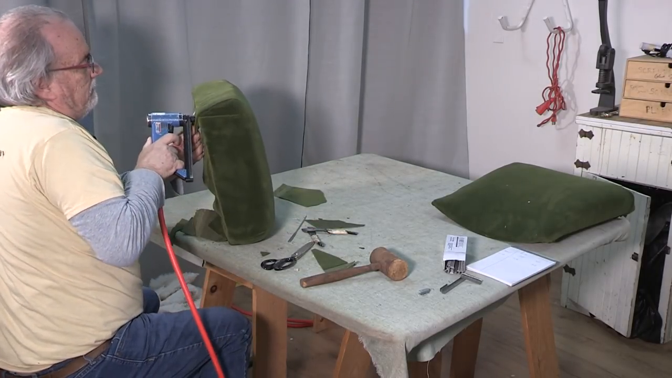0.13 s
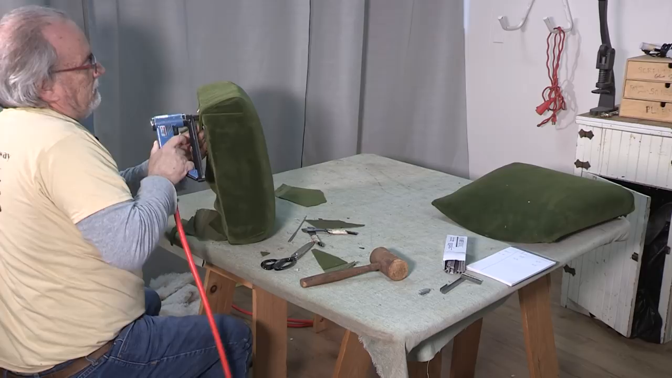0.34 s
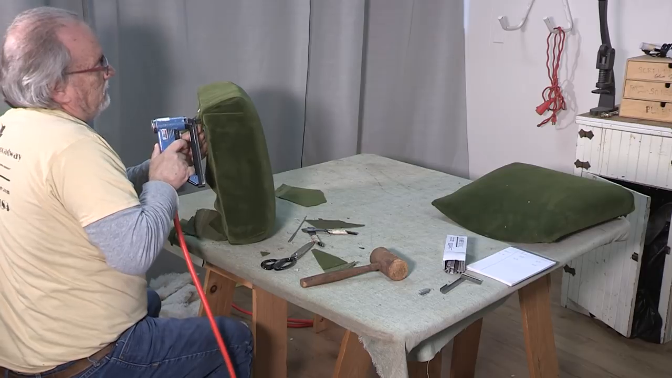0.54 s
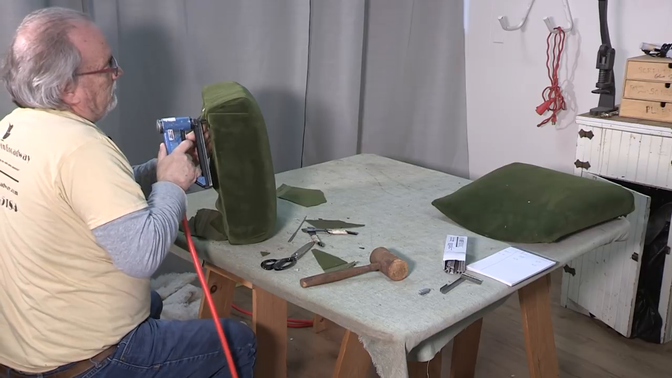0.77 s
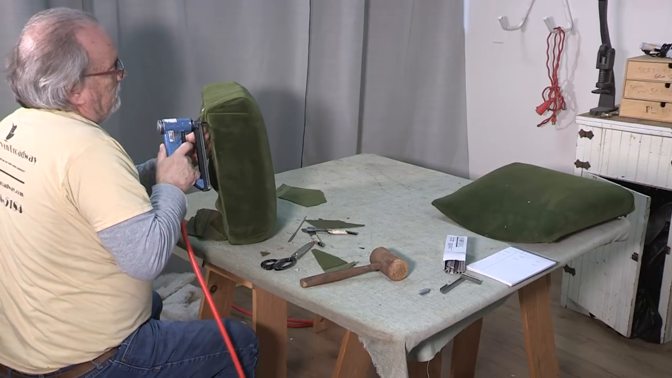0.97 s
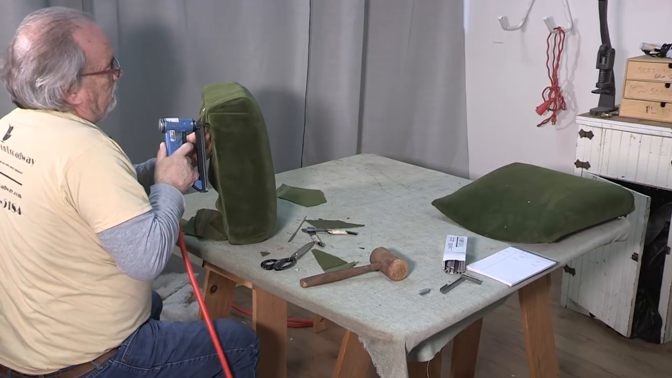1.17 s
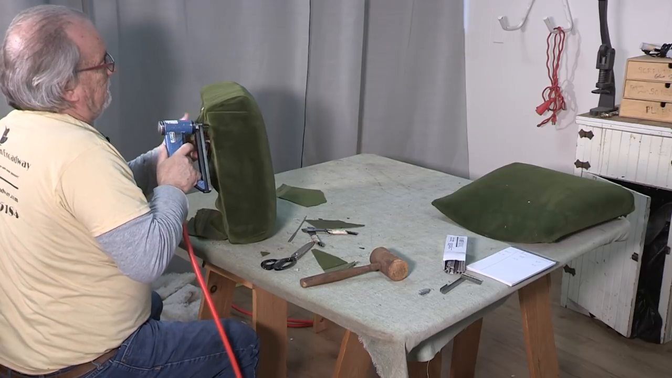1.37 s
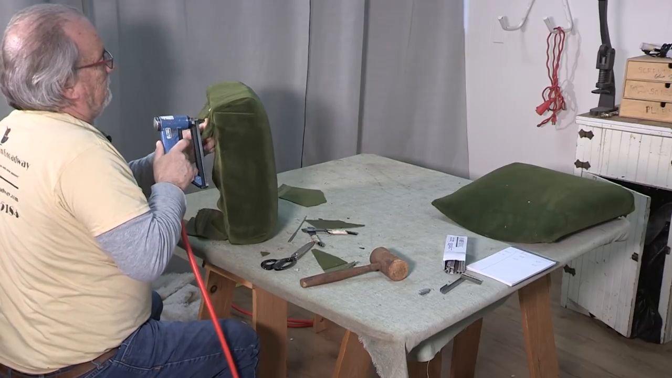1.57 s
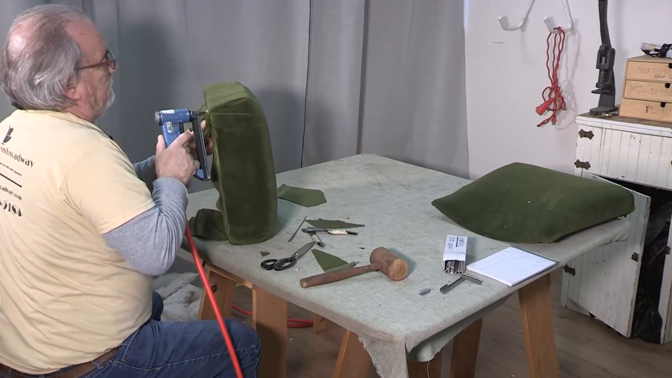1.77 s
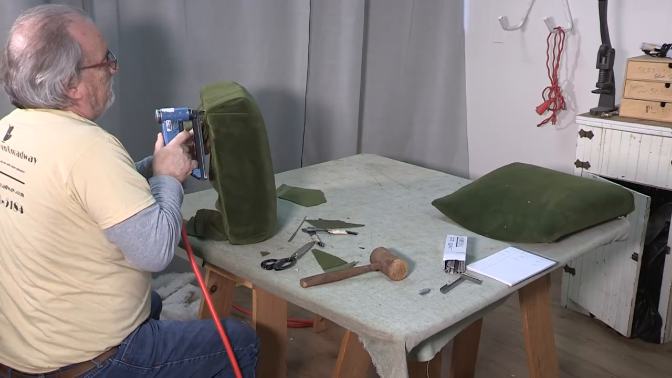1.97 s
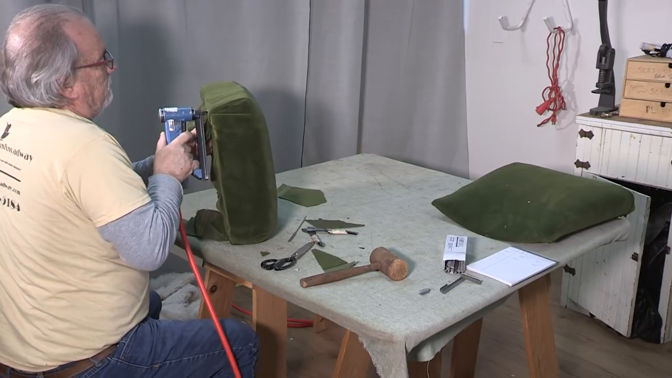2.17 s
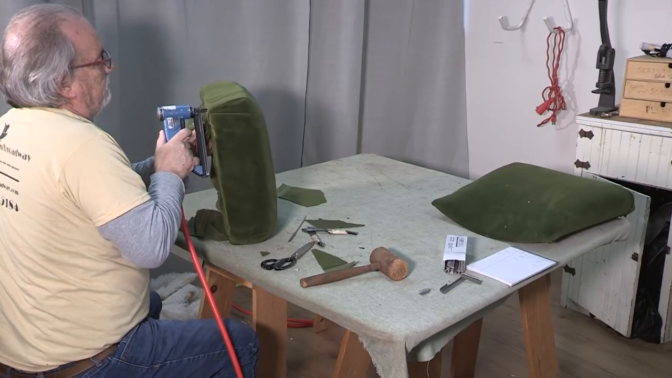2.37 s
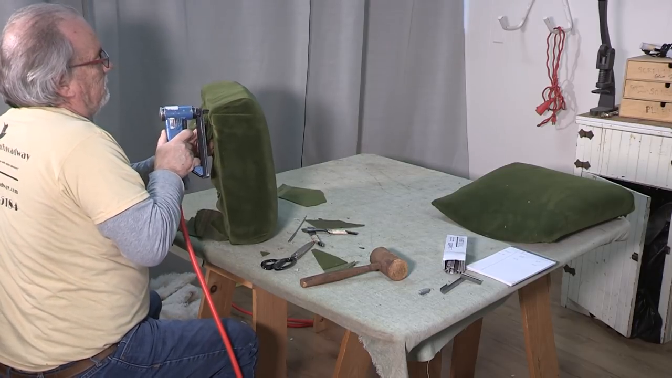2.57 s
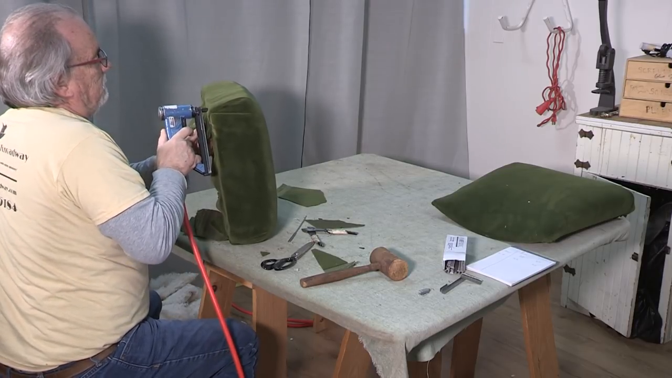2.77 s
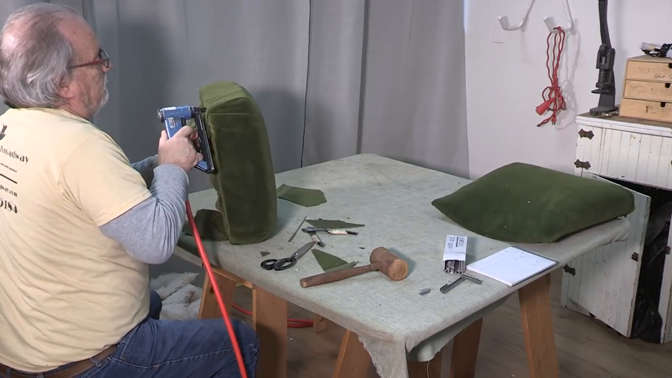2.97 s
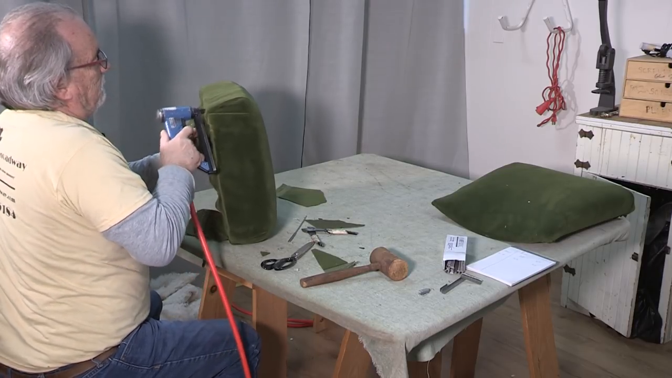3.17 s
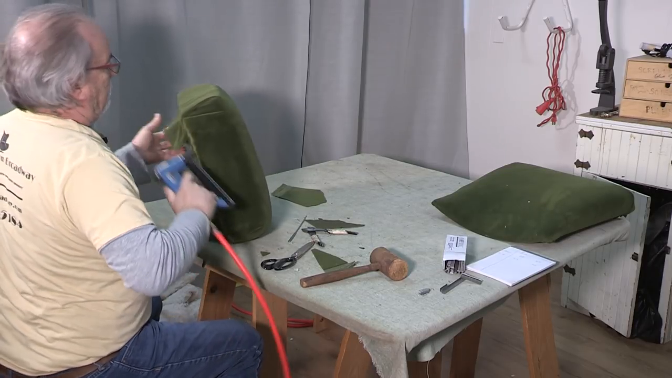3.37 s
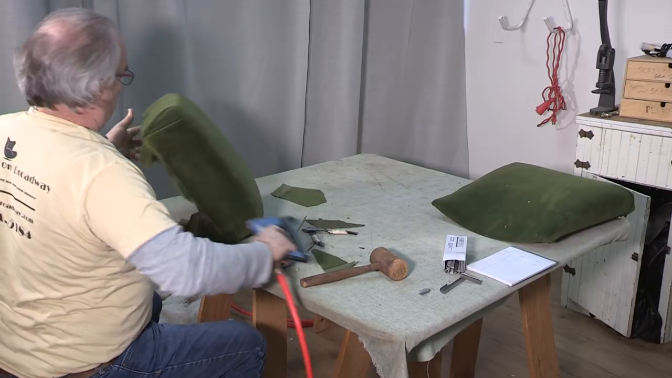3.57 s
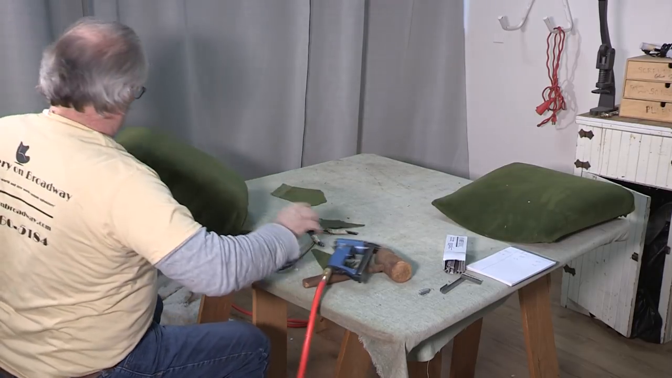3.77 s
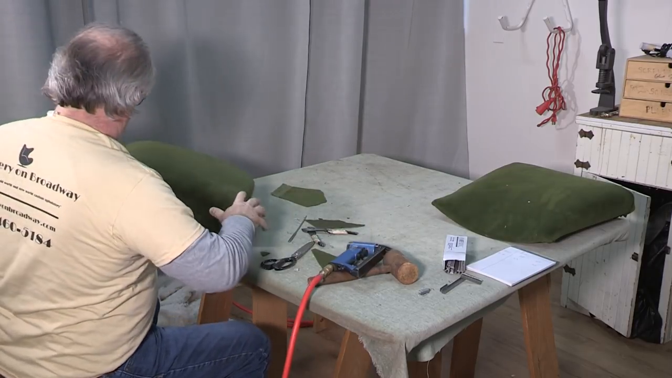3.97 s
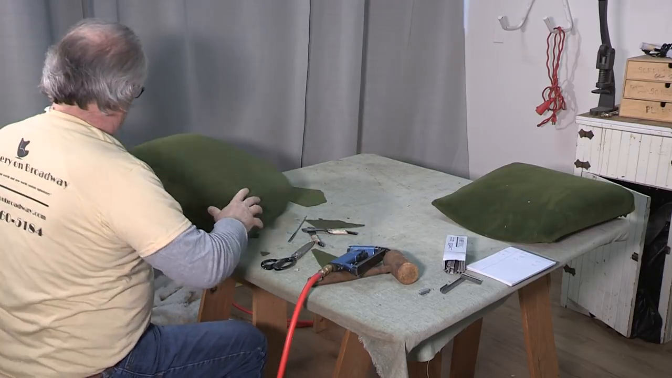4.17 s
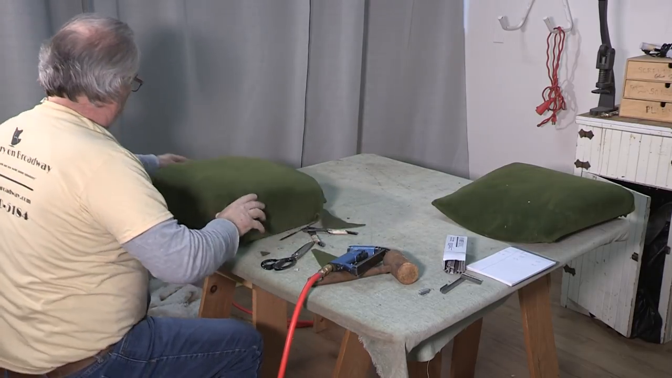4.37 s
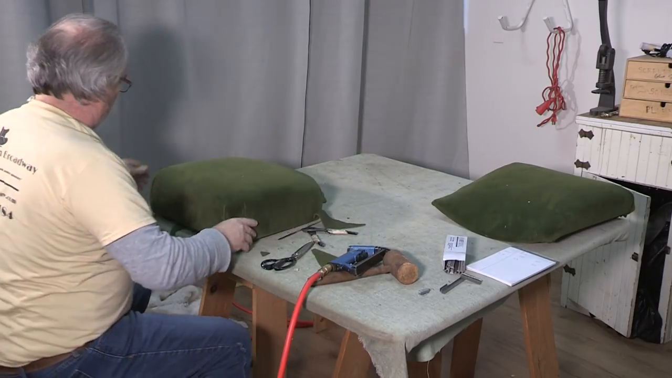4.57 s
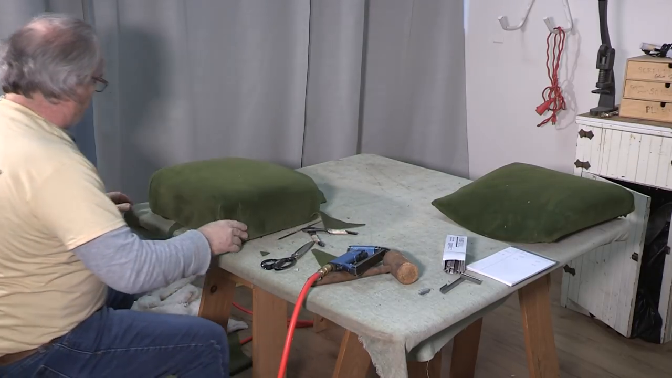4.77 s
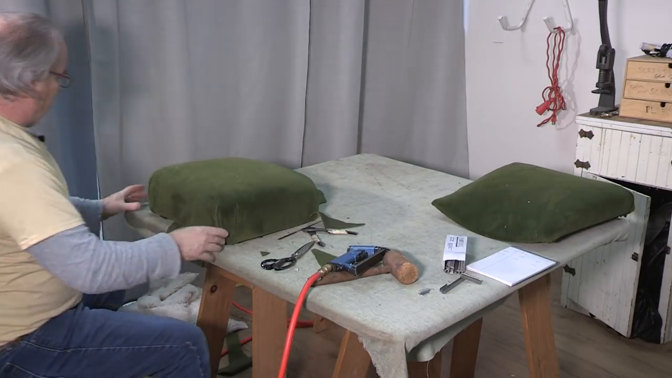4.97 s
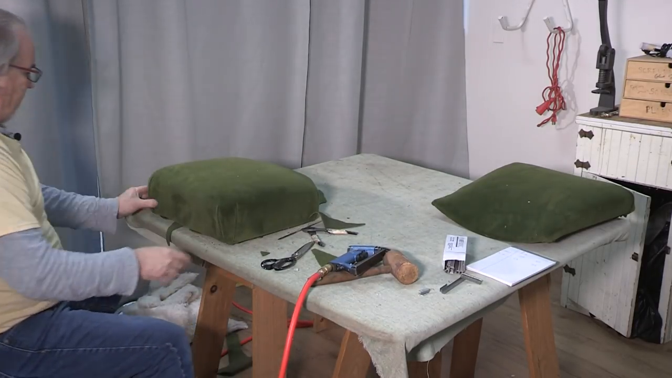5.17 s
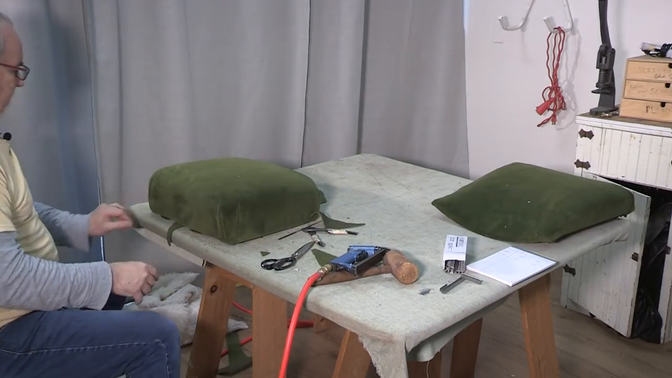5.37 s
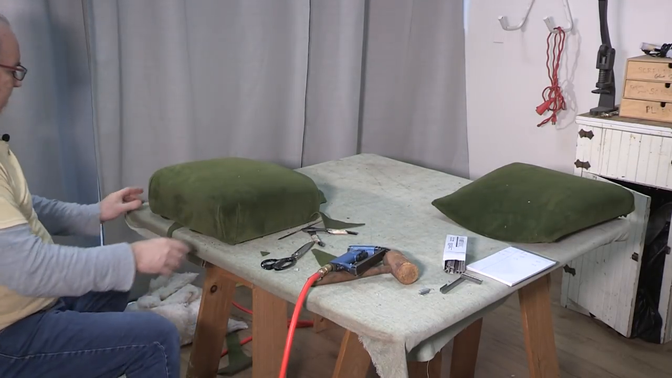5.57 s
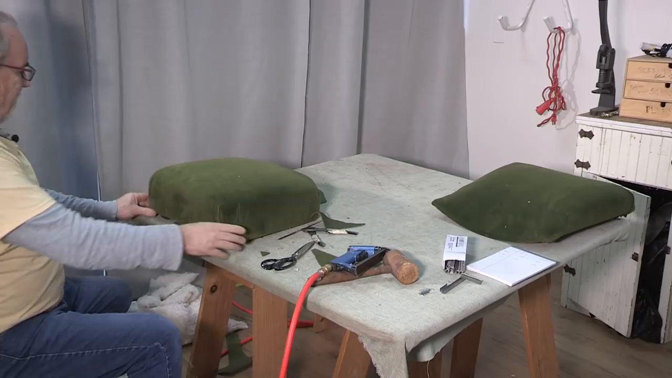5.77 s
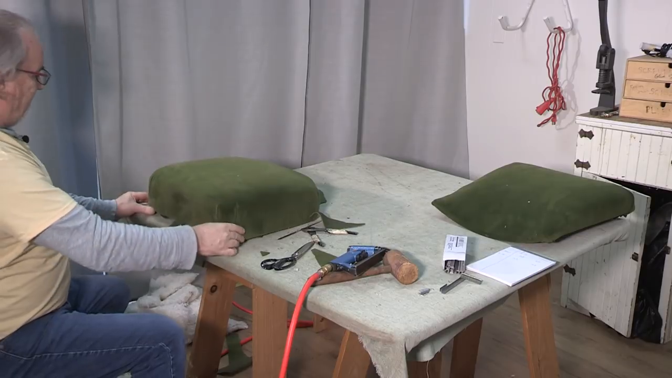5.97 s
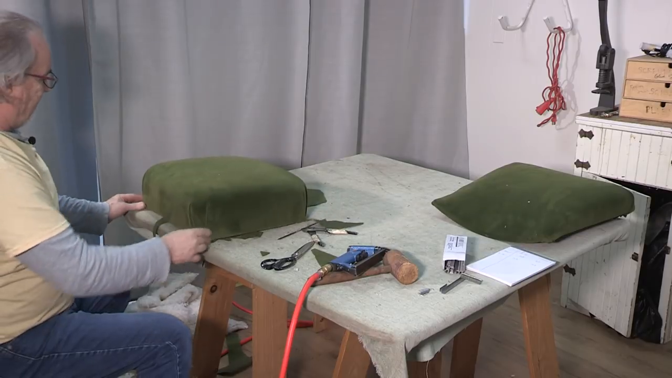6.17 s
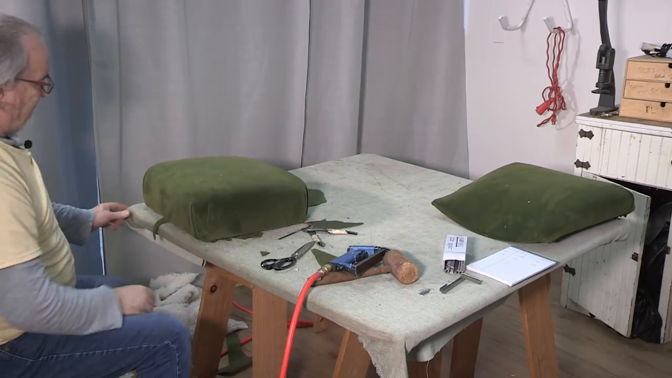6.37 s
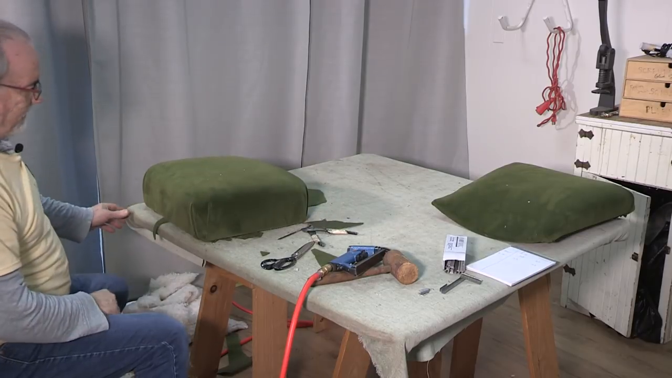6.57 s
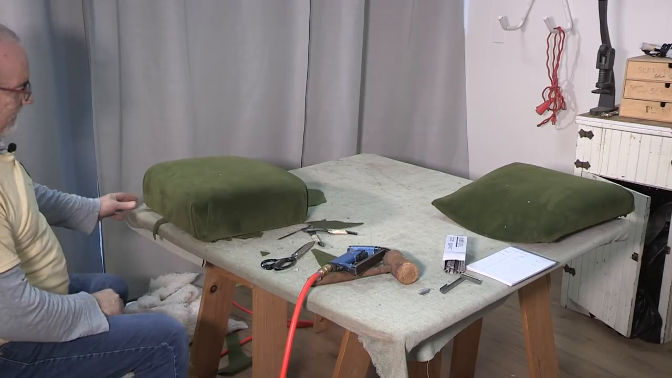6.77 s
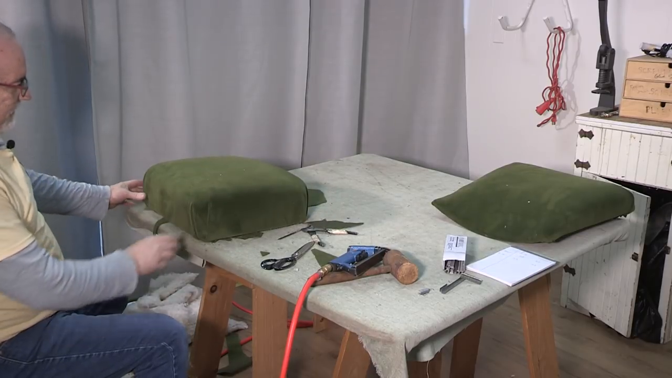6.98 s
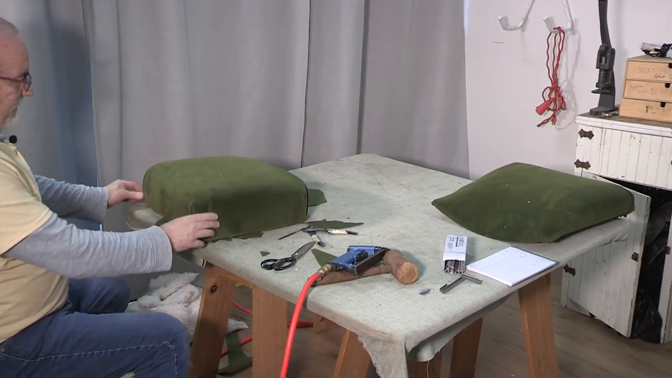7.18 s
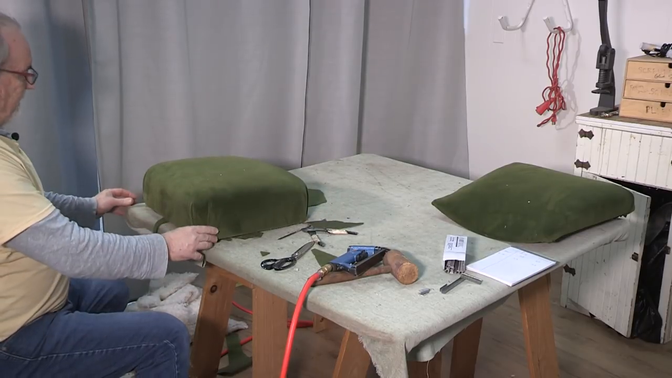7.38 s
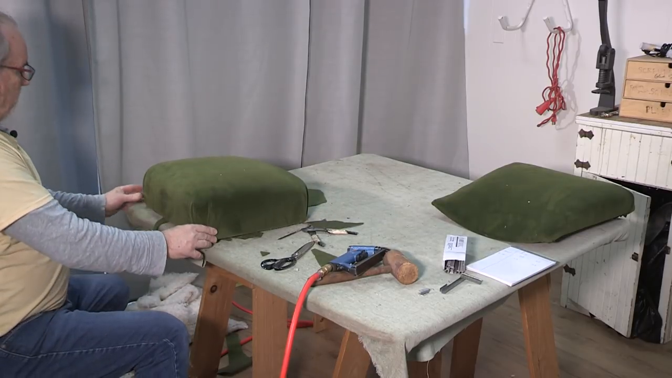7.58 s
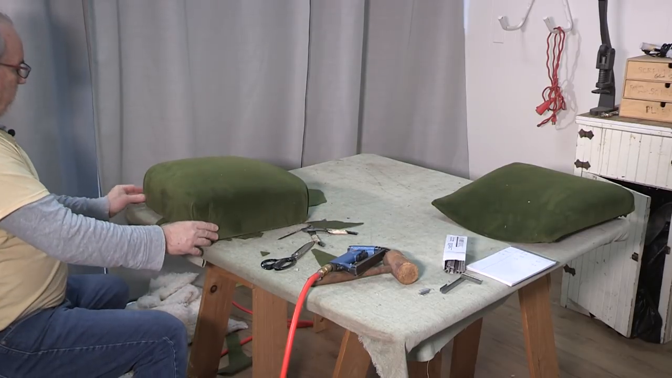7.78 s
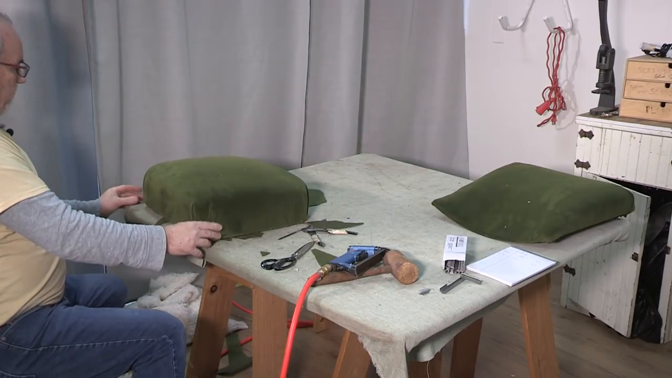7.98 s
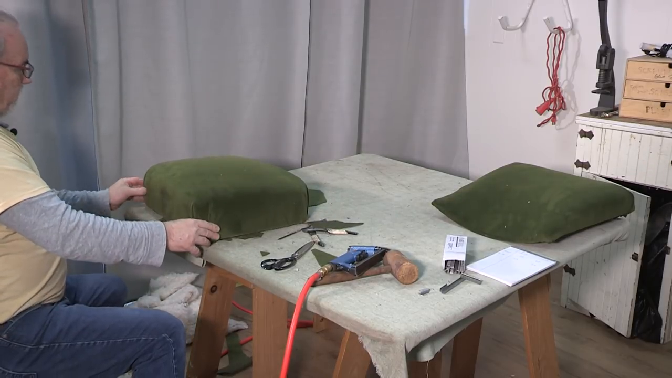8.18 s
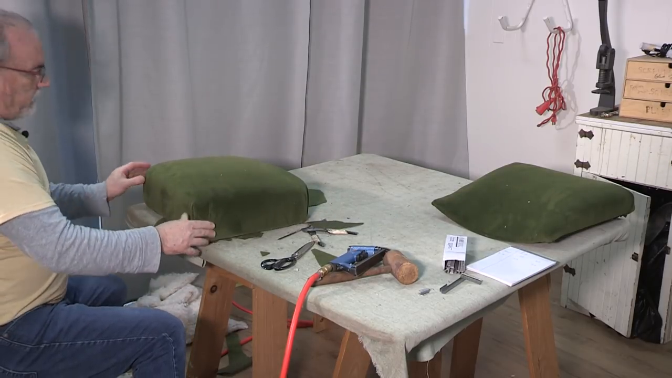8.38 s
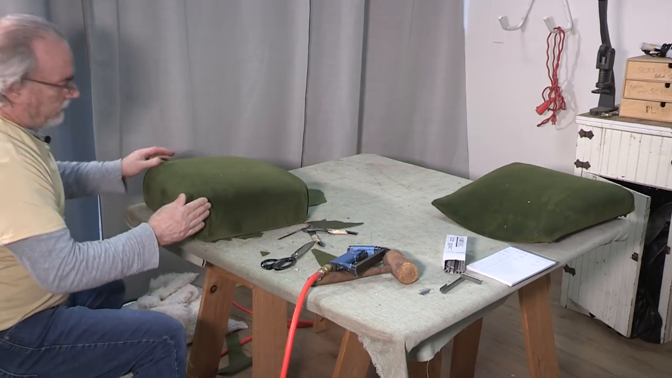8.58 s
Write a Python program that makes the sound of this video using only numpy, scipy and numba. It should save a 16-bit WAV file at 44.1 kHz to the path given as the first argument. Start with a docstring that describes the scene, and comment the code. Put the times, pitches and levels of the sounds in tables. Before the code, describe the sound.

Six snapping, puffing shots from a pneumatic staple gun in a small workshop, then the tool is dropped and a cushioned seat shifted around.

```python
"""An air stapler fires six times into a padded seat, close to the microphone in a small workshop.
Each shot is a trigger tick, a blast of air with the blade's blow, then the piston's thump and exhaust.
The tool is dropped on the table, the seat laid flat and the table dragged about, with knocks and clicks.
Echoes flutter between the walls over a hissing hose, heard by a stereo camera with gain control."""
import sys
import numpy as np
from scipy import signal
from scipy.fft import rfft, irfft
from scipy.io import wavfile
from scipy.ndimage import uniform_filter1d
from numba import njit

SR = 44100
rng = np.random.default_rng(int(sys.argv[2]) if len(sys.argv) > 2 else 0)


def generate_wav(sig):
    """Save sig (samples, or channels by samples) to the path in sys.argv[1] as 16-bit PCM at SR."""
    pcm = np.round(np.clip(np.atleast_2d(sig).T, -1, 1) * 32767).astype(np.int16)
    wavfile.write(sys.argv[1], SR, pcm)


N = 380583


def undb(db):
    return 10 ** (np.asarray(db) / 20)


def on_log(table, hz):
    """Reads a table along a log frequency axis."""
    points_hz, values = np.transpose(table)
    return np.interp(np.log(np.maximum(hz, 1)), np.log(points_hz), values)


def level_curves(table):
    """One dB curve per level column, silent outside the table's times."""
    times, *columns = np.transpose(table)
    return [np.interp(np.arange(N) / SR, times, db, left=-120, right=-120) for db in columns]


def colour(x, tone, peaks=(), tilt_db=0):
    """Causal filter: a tone curve, resonances and a tilt per octave; white noise keeps its rms."""
    hz = np.fft.rfftfreq(8192, 1 / SR)
    db = on_log(tone, hz) + tilt_db * np.log2(np.maximum(hz, 50) / 2000)
    db += sum(boost / (1 + (2 * (hz - centre) / width) ** 2) for centre, width, boost in peaks)
    cepstrum = irfft(db * np.log(10) / 20)
    cepstrum[1:4096] *= 2  # fold to minimum phase
    cepstrum[4097:] = 0
    impulse = irfft(np.exp(rfft(cepstrum)))[:4096]
    return signal.oaconvolve(x, impulse / np.sqrt(np.sum(impulse ** 2)))[:len(x)]


def hump(hz, octaves, skirt_db):
    """Tone curve of a resonance, 10 dB down at `octaves` to each side."""
    return [(hz * 2 ** (-2.5 * octaves), min(skirt_db + 7, -24)),
            (hz * 2 ** -octaves, -10), (hz, 0), (hz * 2 ** octaves, -10),
            (min(hz * 2 ** (2.7 * octaves), 15000), skirt_db), (20000, skirt_db - 19)]


def burst(rise_s, fall_s, blow=0.):
    """Grainy noise that rises, then dies away; a hard blow leads it with one sharp push."""
    t = np.arange(SR // 2) / SR
    noise, grain = rng.standard_normal((2, len(t)))
    envelope = (1 - np.exp(-t / max(rise_s, 1e-4))) ** 2 * np.exp(-t / max(fall_s, 1e-3))
    x = noise * undb(3.5 * grain) * envelope
    x[0] = blow * np.sqrt(np.sum(x ** 2))
    return x[:int((10 * fall_s + .1) * SR)]


def add(out, start_s, x, db, pan_db=0):
    """Places a sound; db is its energy spread over 2 ms, pan_db is left minus right."""
    i = int(start_s * SR)
    x = x[:N - i] * undb(db) * np.sqrt(.002 * SR / np.sum(x ** 2))
    out[:, i:i + len(x)] += x * undb(np.array([[pan_db], [-pan_db]]) / 2)


def walk(rate_hz):
    """Glides between random levels; spread near 1."""
    step = int(SR / rate_hz)
    return uniform_filter1d(np.repeat(rng.standard_normal(N // step + 1), step), step)[:N]


def rough_noise(depth_db, rate_hz):
    """Noise whose level flickers."""
    return rng.standard_normal(N) * undb(depth_db * walk(rate_hz))


def pair(x, y, likeness):
    """Left and right channels from two unrelated sounds."""
    mid, side = np.sqrt(1 + likeness) * x, np.sqrt(1 - likeness) * y
    return np.array([mid + side, mid - side]) / np.sqrt(2)


# room tone of the workshop: pitch_hz, level_db
SHOP_TONE = [(25, -50), (60, -20.5), (130, -3.5), (180, -14.5), (260, -7.5), (500, -12.5), (1000, -20.5),
             (2000, -22.5), (3000, -26.5), (4500, -33), (5600, -34), (6700, -24), (8200, -30.5),
             (9500, -29), (12000, -43), (15800, -41)]


def shop_air():
    """Low, faintly wavering noise all around the microphone."""
    air = [colour(rng.standard_normal(N), SHOP_TONE) for _ in range(2)]
    return pair(*air, likeness=0.77) * undb(-51.5 + 0.46 * walk(3.1))


# escaping air: pitch_hz, level_db
LEAK_TONE = [(4000, -8), (7000, -6.5), (9500, -6.5), (12500, -1.5), (15500, -7.5)]
# its whistles: pitch_hz, width_hz, boost_db
LEAK_WHISTLES = [(11950, 500, 4), (14100, 270, -1), (9440, 1100, 10)]
# tugs on the hose: peak_s, level_db, half_length_s
HOSE_TUGS = [(0.0, -44, 0.033), (0.81, -43, 0.083), (1.936, -61.5, 0.29), (3.754, -49, 0.27)]


def hose_leak():
    """The coupling hisses, louder when tugged; the hiss dips after each shot and swells back."""
    leak_db, dip_db, recover_s = -57.5, -28, 0.25
    t = np.arange(N) / SR
    dips_db = sum(dip_db * (t > s) * np.exp(-np.abs(t - s) / recover_s) for s, *_ in BLASTS)
    tugs = sum(undb(db) * np.exp(-((t - s) / half_s) ** 2) for s, db, half_s in HOSE_TUGS)
    hiss = [colour(rng.standard_normal(N), LEAK_TONE, LEAK_WHISTLES) for _ in range(2)]
    return pair(*hiss, likeness=0.48) * (undb(leak_db + dips_db) + tugs)


# bumps on seat and table: start_s, level_db, pitch_hz, width_octaves, fall_s, pan_db
KNOCKS = [(0.0, -13.5, 380, 1.53, 0.0066, -3), (0.031, -11.5, 200, 1.43, 0.3, 0.5),
          (0.179, -0.5, 284, 1.45, 0.0023, 2), (0.184, -13, 142, 0.72, 0.032, -0.5),
          (3.661, -12.5, 680, 0.98, 0.025, 1.5), (3.89, -12, 840, 0.29, 0.0054, -3),
          (4.105, -32.5, 285, 0.81, .005, 4), (4.137, -36, 298, 0.96, 0.009, -1.5),
          (4.524, -16, 158, 1.3, 0.017, 2.5), (4.56, -18, 332, 1.76, 0.0055, 2),
          (4.664, -23.5, 313, 0.52, 0.0034, 2), (4.7392, -27.5, 494, 1.44, 0.0026, 4),
          (4.874, -25.5, 467, 0.22, .006, 3), (4.948, -27.5, 736, 0.42, 0.0038, -4),
          (4.963, -21, 317, 0.96, 0.0034, 0), (5.04, -27.5, 450, 0.67, 0.017, 0),
          (5.2, -32, 410, 0.97, 0.019, 5), (5.3, -34, 328, 0.39, .006, 5),
          (5.40, -27.5, 281, 0.89, .011, 0), (5.635, -31.5, 260, 0.93, 0.011, -1),
          (5.70, -24, 239, .7, 0.0076, 1.5), (5.754, -31, 237, .9, 0.0031, 1),
          (5.861, -35.5, 239, 1.13, .006, 0), (6.183, -24.5, 660, 0.76, .005, -2),
          (8.156, -41.5, 270, 0.36, 0.0064, 2), (8.246, -21, 700, 0.63, 0.047, -1),
          (8.383, -39, 815, 0.32, 0.0053, -2), (8.504, -19, 746, 0.94, 0.008, -1),
          (8.508, -30.5, 260, 1.1, .012, 1)]


def knocks(out):
    """Blows on wood and padding, each with one dull resonance."""
    for s, db, hz, octaves, fall_s, pan_db in KNOCKS:
        add(out, s, colour(burst(0.00064, fall_s, blow=0.76), hump(hz, octaves, -43)), db, pan_db)


# clicks and creaks: start_s, level_db, pitch_hz, width_octaves, fall_s, crack_db, pan_db
CLICKS = [(0.18, -13, 1440, 0.87, 0.0016, -46, -6), (3.831, -10.5, 3220, 0.11, 0.0051, -32, -5),
          (4.528, -29, 2630, .84, .005, -36, 3), (4.534, -19.5, 1780, 0.64, 0.033, -40, 1),
          (4.873, -30, 1820, .3, .009, -41, 1), (4.94, -33, 2020, .35, 0.012, -25, 2),
          (5.714, -38, 4020, .25, 0.0069, -22, 3), (6.2, -36.5, 1670, 0.71, 0.0081, -27, -4),
          (6.349, -28, 2080, 0.21, .002, -29, 1), (6.654, -47, 2200, .26, 0.0043, -48, -3),
          (6.832, -24.5, 4300, 0.65, 0.0036, -42, 0), (6.84, -29.5, 2200, 0.33, 0.0023, -36, -4),
          (6.845, -21, 4200, 0.42, 0.01, -38, -3), (7.067, -39, 3630, 0.34, 0.0033, -40, -7),
          (7.691, -37.5, 4650, .15, .019, -47, -13), (7.701, -38, 2150, .16, 0.015, -7, -14),
          (7.736, -23.5, 3840, 0.44, 0.019, -22, -3.5), (8.065, -41.5, 3530, .1, .008, -31, -6),
          (8.238, -20, 3300, 0.57, 0.0078, -20, -10), (8.248, -13, 3070, 0.62, 0.019, -16, -1.5),
          (8.25, -18.5, 3570, .19, 0.05, -52, -1), (8.513, -26.5, 1700, 0.61, .045, -42, -3.5)]


def clicks(out):
    """A bright resonance over a broad crack; longer rattles swell more slowly."""
    for s, db, hz, octaves, fall_s, crack_db, pan_db in CLICKS:
        rattle = burst(0.16 * fall_s, fall_s, blow=0.39)
        add(out, s, colour(rattle, hump(hz, octaves, crack_db)), db, pan_db)


# resonances of the stapler's body: pitch_hz, width_hz, boost_db
TOOL_BODY = [(315.6, 105, 7), (1700, 270, 3.5), (2015, 160, 4.5), (2516, 320, 1), (6550, 380, 1.5),
             (8920, 730, 3)]
# trigger pulls: start_s, level_db, rise_s, fall_s
TICKS = [(0.186, -23, 0.00085, 0.0025), (0.711, -22.5, 0.015, 0.013), (1.139, -27, 0.017, 0.012),
         (2.176, -20, 0.017, 0.012), (2.609, -34, .01, 0.012), (2.631, -20.5, 0.0022, 0.0073),
         (3.108, -27, 0.0012, .008)]


def trigger(out):
    """The trigger ticks and the valve gives its first hiss."""
    for s, db, rise_s, fall_s in TICKS:
        add(out, s, colour(burst(rise_s, fall_s), hump(3900, 2.1, -18), TOOL_BODY), db)


# the six shots: start_s, level_db, tilt_db_per_octave, pan_db
BLASTS = [(0.203, -3.5, -1, -1), (0.727, 0.5, 2.5, -0.3), (1.156, -2.5, 1.6, -0.3), (2.192, -4, 0.9, -2.5),
          (2.645, -0.5, 2.2, -2), (3.128, -3.5, 0.8, 1.5)]
# the driving air: pitch_hz, level_db
BLAST_TONE = [(35, -61), (60, -25), (206, -13.5), (291, -7), (433, -16), (642, -2.5), (738, -11),
              (1630, -5), (1870, -11.5), (2650, -8), (5580, -20.5), (6710, -17), (15500, -27.5)]


def air_blasts(out):
    """Compressed air bursts through the tool's body, close to the microphone."""
    for s, db, tilt_db, pan_db in BLASTS:
        air = burst(rise_s=0.0058, fall_s=0.012)
        add(out, s, colour(air, BLAST_TONE, TOOL_BODY, tilt_db), db, pan_db)


# the blade's cracks and their echoes: start_s, level_db
CRACKS = [(0.2137, -5), (0.226, -10.5), (0.736, -5.5), (1.1605, -6), (1.1764, -12), (2.195, -7.5),
          (2.2111, -5.5), (2.6566, -5.5), (2.6634, -21), (3.134, -4), (3.148, -19)]
# tone of a crack: pitch_hz, level_db
CRACK_TONE = [(300, -15), (1500, -13.5), (3000, 1.5), (6700, 2.5), (9000, 0.5), (15500, -9.5)]


def blade(out):
    """The blade's sharp crack, on most shots followed by a quick echo off the walls."""
    for s, db in CRACKS:
        add(out, s, colour(burst(0.0001, 0.001, blow=0.099), CRACK_TONE, TOOL_BODY), db)


# piston returns: start_s, thump_db, exhaust_db, pan_db
RETURNS = [(0.3238, -2, -16, -1.5), (0.843, -2.5, -15, -2), (1.286, -1.5, -13.5, 0),
           (2.310, -3, -12.5, -3.5), (2.743, -1.5, -11, -2), (3.216, -2.5, -11.5, -0.3)]
# the piston landing: pitch_hz, level_db
THUMP_TONE = [(60, -19), (130, -3), (210, -3.5), (310, -3), (560, -5), (1000, -6), (1750, -4), (2400, -6),
              (3800, -15.5), (7700, -12), (15500, -24)]
# the spent air: pitch_hz, level_db
EXHAUST_TONE = [(60, -35), (200, -1.5), (500, -4), (1000, -11.5), (1800, -15), (3500, -6), (5600, -16),
                (9000, -14), (11000, -30), (15500, -46)]


def piston_return(out):
    """The valve vents just before the piston lands; the cylinder empties and a soft sigh follows."""
    empty_s = .115
    air_left = np.exp(-(np.arange(SR // 2) / SR / empty_s) ** 3)
    for s, thump_db, exhaust_db, pan_db in RETURNS:
        thump = colour(burst(0.00056, 0.0016, blow=0.71), THUMP_TONE, TOOL_BODY)
        vent = colour(burst(0.00013, 0.0029), CRACK_TONE)
        exhaust = colour(burst(0.001, .07) * air_left, EXHAUST_TONE)
        sigh = colour(burst(0.015, 0.028), hump(2160, 0.62, -40))
        add(out, s, thump, thump_db, pan_db)
        add(out, s - .005, vent, thump_db - 21.5, pan_db)
        add(out, s - .006, exhaust, exhaust_db, pan_db)
        add(out, s + .13, sigh, exhaust_db - 16.5, pan_db)


# the dropped tool's bounces: time_s, level_db
CLATTER = [(3.8, -41), (3.828, -8.5), (3.85, -19), (3.872, -23), (3.898, -16.5), (3.915, -26), (3.98, -40)]
# tool against table top: pitch_hz, level_db
CLATTER_TONE = [(35, -67.5), (60, -19), (123, 3.5), (175, -4), (312, -5), (546, -10), (910, -3), (1020, -5),
                (3190, -6), (3500, -13.5), (6710, -10), (11700, -20), (15500, -29)]


def tool_drop():
    """The stapler clatters onto the table in uneven bounces."""
    rattle = rough_noise(depth_db=7.74, rate_hz=200)
    return colour(rattle * undb(level_curves(CLATTER)[0] - 4), CLATTER_TONE)


# seat and table on the move: time_s, rumble_db, scrape_db
SHIFTS = [(3.95, -40, -45), (4.17, -46, -53), (4.5, -45, -49), (4.57, -43, -37), (4.71, -47, -38.5),
          (4.84, -40.5, -43), (5.44, -42.5, -49.5), (5.8, -45.5, -50.5), (6.4, -43, -55),
          (6.66, -46, -57.5), (7.08, -44, -52.5), (7.52, -49, -60.5), (7.91, -49.5, -60), (8.08, -61, -63),
          (8.47, -84, -69), (8.51, -34.5, -60), (8.63, -63, -47)]
# the dragged table: pitch_hz, level_db
RUMBLE_TONE = [(60, -41), (130, -16.5), (300, -3), (600, -10.5), (1200, -23), (2500, -58)]
# its resonances: pitch_hz, width_hz, boost_db
TABLE_MODES = [(134.6, 80, 14), (212.4, 10.3, 21), (325.6, 11, 11), (401, 25, 9), (497, 9, 4)]
# sliding cloth: pitch_hz, level_db
SCRAPE_TONE = [(410, -31), (700, -2.5), (962, -2), (1210, -8), (1530, -2), (2550, -8), (3090, -12.5),
               (4280, -22.5), (7000, -23.5), (9100, -34), (15400, -120)]


def shifting():
    """The table groans as it is dragged, and cloth scrapes over it."""
    rumble_db, scrape_db = level_curves(SHIFTS)
    rumble = [colour(rough_noise(1.6, 32), RUMBLE_TONE, TABLE_MODES) for _ in range(2)]
    scrape = [colour(rough_noise(2, 60), SCRAPE_TONE) for _ in range(2)]
    return pair(*rumble, likeness=0.94) * undb(rumble_db) + pair(*scrape, likeness=0.24) * undb(scrape_db)


# strokes over the seat: start_s, level_db, rise_s, hold_s
STROKES = [(4.1, -54, 0.18, 0.029), (4.5, -57, 0.12, 0.59), (5.18, -45.5, 0.14, 0.19)]
# skin on fabric: pitch_hz, level_db
BRUSH_TONE = [(1500, -6.5), (3000, -4), (4500, -5.5), (6200, -10.5), (8000, -17), (12000, -25)]


def brushing():
    """Hands brush the fabric: each stroke swells, holds, and fades as the hand lifts."""
    lift_s = 0.07
    t = np.arange(N) / SR
    level = np.zeros(N)
    for s, db, rise_s, hold_s in STROKES:
        swell = np.clip((t - s) / rise_s, 0, 1) ** 2
        lift = np.exp(-np.maximum(t - s - rise_s - hold_s, 0) / lift_s)
        level += undb(db) * swell * lift
    brush = [colour(rough_noise(0.75, 80), BRUSH_TONE) for _ in range(2)]
    return pair(*brush, likeness=0.51) * level


# modes of the tool's steel: pitch_hz, level_db, t60_s
STEEL_MODES = [(4960, -6, 0.075), (6400, -20, .1), (6670, -1, 0.15), (8700, -15, .12), (9700, -20, .12),
               (11110, -14, .12), (13110, -12, 0.18)]


def steel_ring(out):
    """The steel rings once when the seat jogs the tool."""
    t = np.arange(SR // 2) / SR
    ring = sum(undb(db - 60 * t / t60) * np.sin(2 * np.pi * hz * t) for hz, db, t60 in STEEL_MODES)
    add(out, start_s=4.473, x=ring, db=-32)


def even(response, width_hz=38.8):
    """Levels a room's peaks and dips from one to ten widths broad; finer ripples stay."""
    power = np.abs(rfft(response, 32768)) ** 2
    hz = np.fft.rfftfreq(32768, 1 / SR)
    narrow = uniform_filter1d(power, int(width_hz / hz[1]))
    broad = uniform_filter1d(power, int(10 * width_hz / hz[1]))
    return colour(response, np.transpose([hz + 1, -10 * np.log10(narrow / broad)]))


# the workshop's decay: pitch_hz, t60_s
ROOM_T60 = [(100, 0.19), (300, 0.3), (1000, 0.29), (2500, 0.34), (6000, 0.24), (14000, 0.16)]
# its tail at the left and right microphones: pitch_hz, likeness
ROOM_LIKENESS = [(100, 1), (400, 0.89), (1000, 0.7), (3000, 0.22), (8000, 0.78), (14000, 0.42)]


def workshop():
    """Paths to the microphone: direct, off the table top, between facing walls, and a diffuse tail."""
    flutter_s, flutter_db = .0168, -4.5  # per trip between the walls
    tabletop_s, tabletop_db, tail_db = .0036, -6.5, 5
    t = np.arange(int(.6 * SR)) / SR
    flutter = 1 + sum(2.8 * undb(k * flutter_db) * np.exp(-((t - k * flutter_s) / 0.00092) ** 2)
                      for k in range(1, 6))
    onset = 1 - np.exp(-t / 0.00095)
    tail = 0
    for hz in 50 * 2 ** np.arange(0, 8.4, 1 / 3):
        band = signal.butter(2, [hz * 2 ** (-1 / 6), hz * 2 ** (1 / 6)], "bandpass", fs=SR, output="sos")
        t60 = on_log(ROOM_T60, hz)
        noise = signal.sosfilt(band, rng.standard_normal((2, len(t))))
        noise *= undb(-60 * t / t60) * flutter * onset
        # energy follows band width and ringing time
        noise *= np.sqrt(hz * t60 / np.sum(noise ** 2, axis=1, keepdims=True))
        tail = tail + pair(*noise, on_log(ROOM_LIKENESS, hz))
    response = tail * undb(tail_db) / np.sqrt(np.mean(np.sum(tail ** 2, axis=1)))
    response[:, 0] += 1
    response[:, int(tabletop_s * SR)] += undb(tabletop_db)
    for k in range(1, 5):
        response[:, int(k * flutter_s * SR)] += undb((k + 2) * flutter_db - .5)
    return np.array([even(channel) for channel in response])


def scene():
    """Shots and impacts ring in the workshop; rubbing, hiss and room tone lie under them."""
    hits = np.zeros((2, N))
    for source in (knocks, clicks, trigger, air_blasts, blade, piston_return, steel_ring):
        source(hits)
    hits += tool_drop()
    in_room = signal.oaconvolve(hits, workshop(), axes=1)[:, :N]
    return in_room + shop_air() + hose_leak() + shifting() + brushing()


@njit
def follow(x, attack_s, release_s):
    """Envelope that rises fast and falls slowly."""
    level, envelope = 0., np.empty(len(x))
    for i in range(len(x)):
        level += (x[i] - level) / (SR * (attack_s if x[i] > level else release_s))
        envelope[i] = level
    return envelope


def record(dry):
    """The camera's gain dips on loud moments and creeps back; peaks are rounded and the top is cut."""
    # small microphones lose the deep bass
    mic = signal.sosfilt(signal.butter(2, 65, "highpass", fs=SR, output="sos"), dry)
    peak = np.max(np.abs(mic), axis=0)
    quick = follow(peak, attack_s=0.00047, release_s=.06)
    slow = follow(peak, attack_s=0.0059, release_s=.5)
    gain = np.minimum(1, (undb(-11.5) / (quick + 1e-9)) ** 0.3)
    gain *= np.minimum(1, (undb(-54) / (slow + 1e-9)) ** 0.056)
    rounded = .82 * np.tanh(mic * gain / .82)
    return signal.sosfilt(signal.ellip(10, .2, 75, 15620, fs=SR, output="sos"), rounded)


dry = scene()
out = record(dry)
generate_wav(out)
```